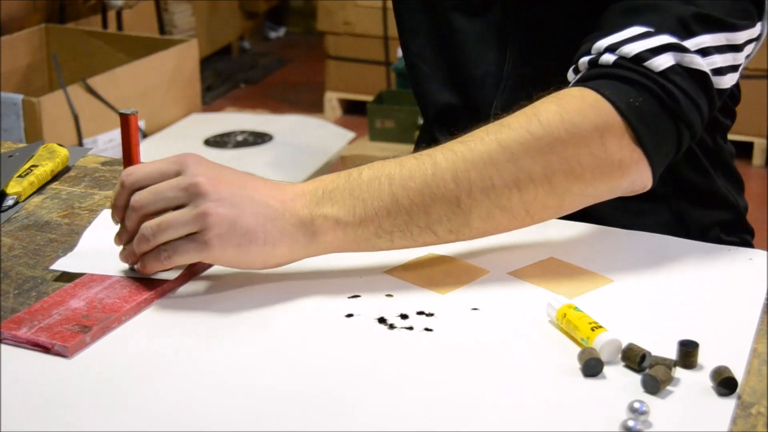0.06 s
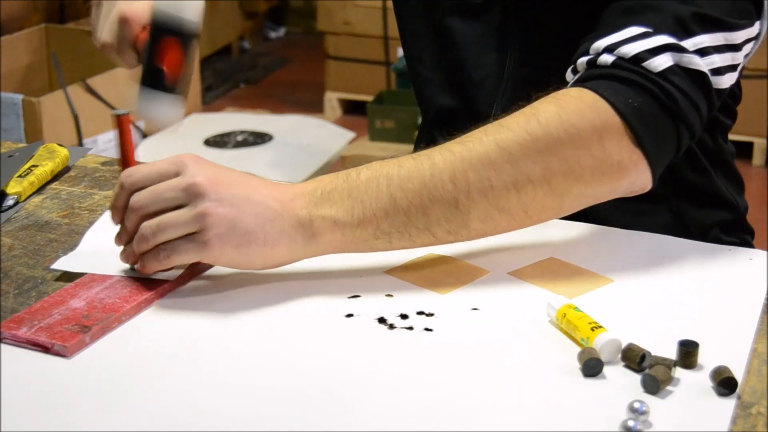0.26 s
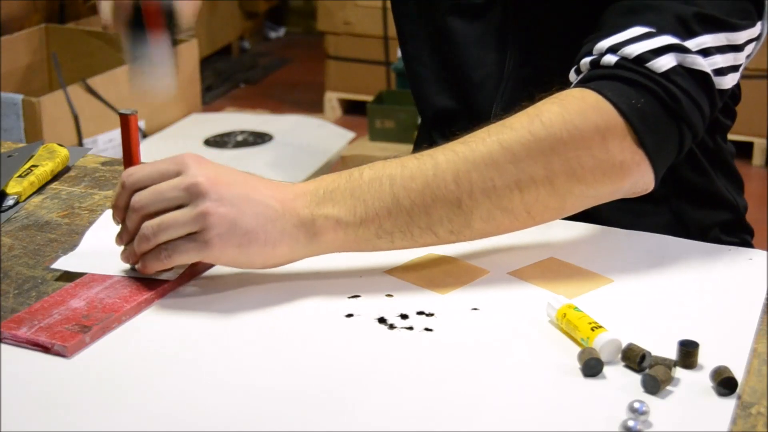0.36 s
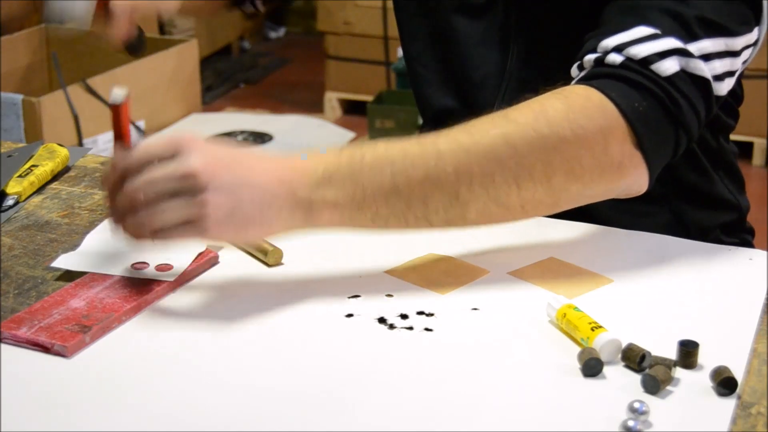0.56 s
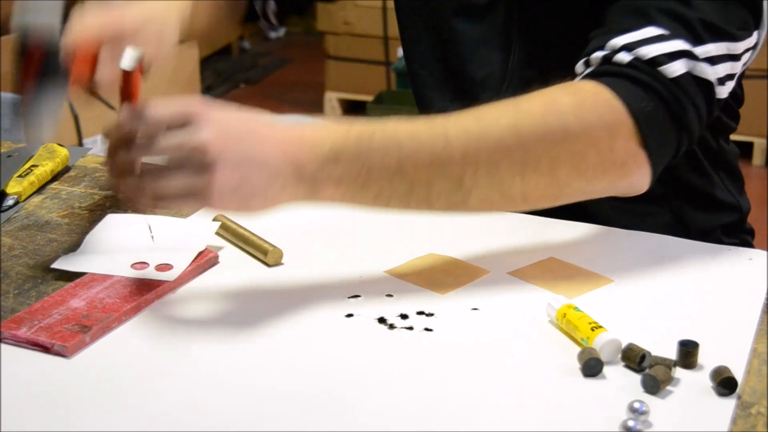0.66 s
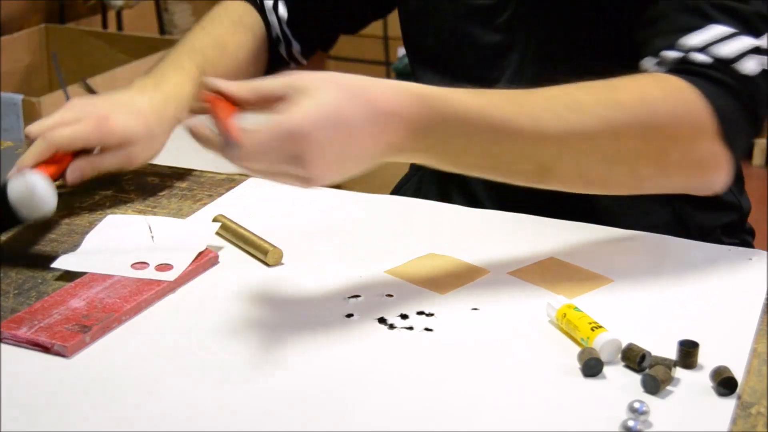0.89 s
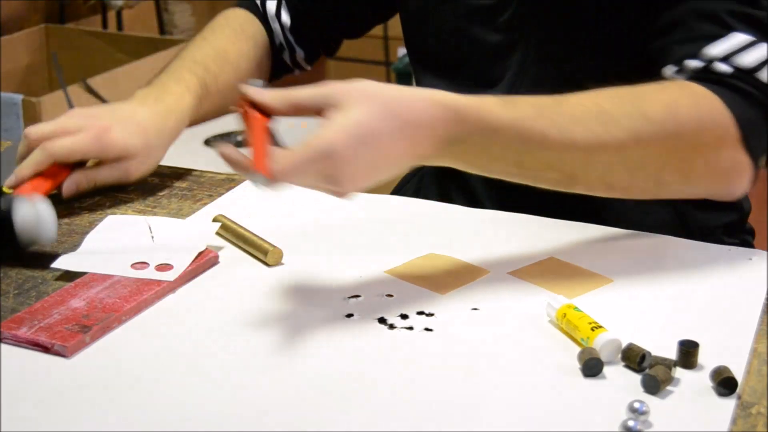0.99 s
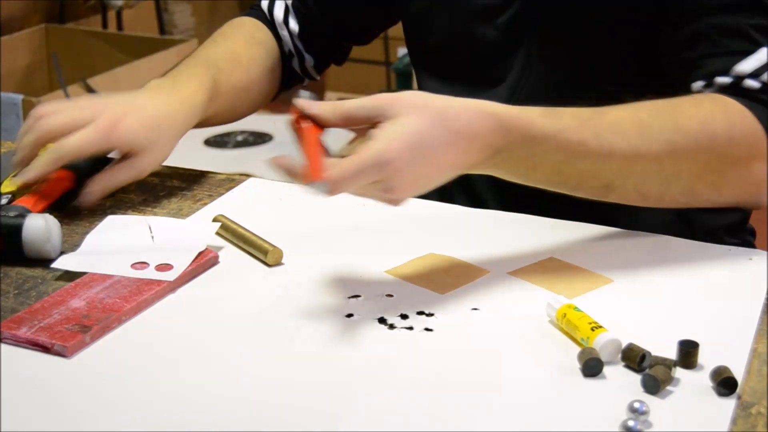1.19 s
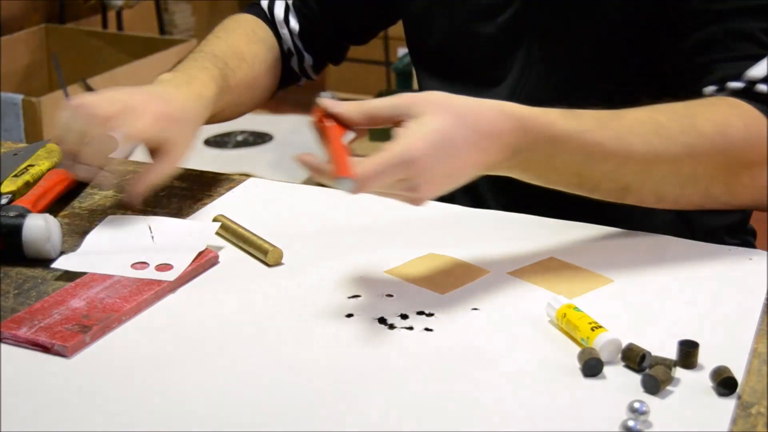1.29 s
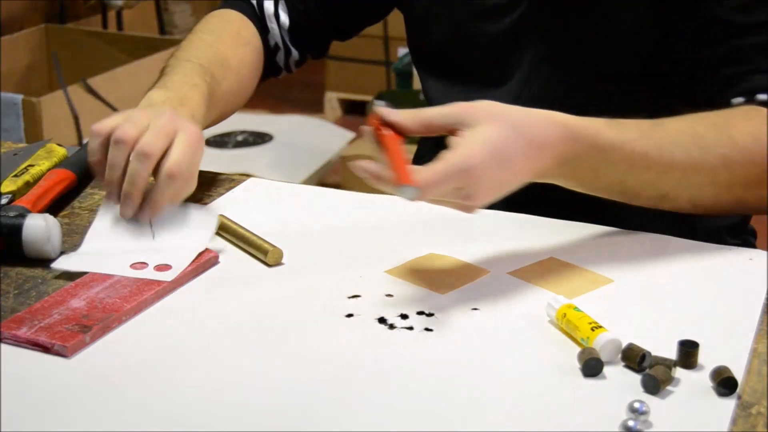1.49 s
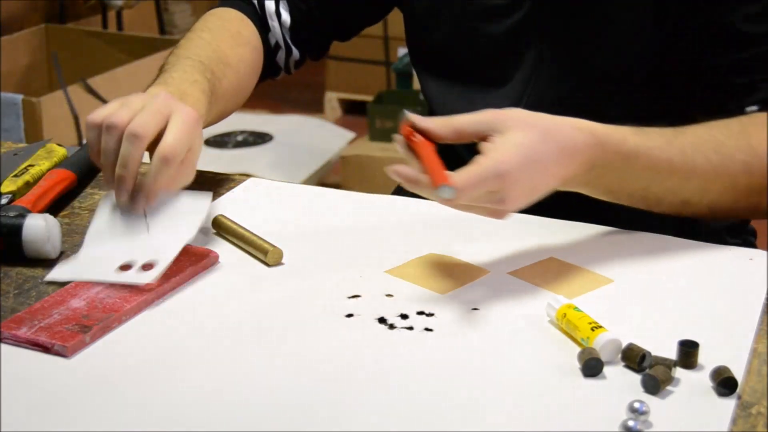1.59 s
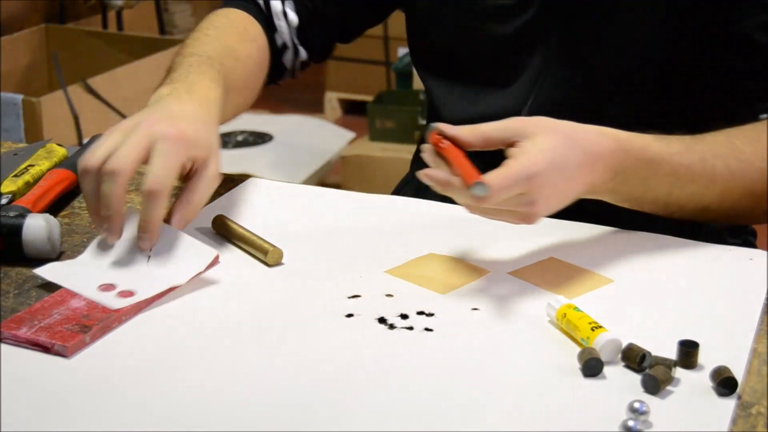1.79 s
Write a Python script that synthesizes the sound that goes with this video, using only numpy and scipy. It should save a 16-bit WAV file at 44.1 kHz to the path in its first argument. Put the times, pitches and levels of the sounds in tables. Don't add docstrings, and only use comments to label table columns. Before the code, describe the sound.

Hammer blow on a steel punch, one overloaded crack ringing through a storeroom, then tool knocks

```python
import sys
import numpy as np
from scipy import signal
from scipy.fft import rfft, irfft, next_fast_len
from scipy.io import wavfile
from scipy.ndimage import uniform_filter1d, map_coordinates

SR = 44100
rng = np.random.default_rng(int(sys.argv[2]) if len(sys.argv) > 2 else 0)


def volts(x):
    e = np.asarray(x, float) / 20
    return 10 ** e


def inscribe(sig):
    pcm = np.round(np.clip(np.atleast_2d(sig).T, -1, 1) * 32767)
    wavfile.write(sys.argv[1], SR, pcm.astype(np.int16))


N = 81585
T = np.arange(N) / SR
SECOND = T[:SR]
BLOW_S = .242


def unit(x):
    return x / np.sqrt(np.mean(x ** 2) + 1e-20)


def along(points, hz):
    f, v = np.transpose(points)
    return np.interp(np.log(hz + 1), np.log(f + 1), v)


def filtered(x, response):
    m = next_fast_len(len(x) + 8192)
    spectrum = rfft(x, m) * response(np.fft.rfftfreq(m, 1 / SR))
    return irfft(spectrum, m)[:len(x)]


def tail(t60s, tone):
    hz, t, z = signal.stft(rng.standard_normal(SR), SR, nperseg=256)
    colour = unit(volts(along(tone, hz))[:, None])
    decay = volts(-60 * t / along(t60s, hz)[:, None])
    return signal.istft(z * colour * decay, SR, nperseg=256)[1][:SR]


def ring(modes, attack_s, tilt_db=0, scatter_db=0):
    total = 0
    for hz, db, t60, *swing in modes:
        level = db + tilt_db * np.log2(hz / 1000) + scatter_db * rng.normal()
        decay = volts(level - 60 * SECOND / t60)
        total = total + np.prod(swing) * decay * np.sin(2 * np.pi * hz * SECOND)
    return (1 - np.exp(-SECOND / attack_s)) ** 2 * total


def waver(depth_db, rate_hz):
    return volts(depth_db * map_coordinates(rng.standard_normal(rate_hz + 4), [SECOND * rate_hz]))


def blur():
    return waver(2, 70)


def add(out, x, s):
    part = out[round(s * SR):][:len(x)]
    part += x[:len(part)]


# (frequency [Hz], level [dB])
AIR_TONE = [(30, -27), (100, -1.5), (300, -7), (1000, -6), (2500, -13), (5000, -22), (8000, -29.5),
            (11500, -39)]


def air():
    air_db, hum_db = -61.5, -72
    hum_hz, half_width_hz, patchy_db = 295, 8, 1.3
    z = signal.stft(rng.standard_normal(N), nperseg=512)[2]
    patches = uniform_filter1d(rng.standard_normal(z.shape), 5, 0)
    patches = uniform_filter1d(patches, 10, 1)
    noise = signal.istft(z * volts(patchy_db * unit(patches)), nperseg=512)[1][:N]
    noise = filtered(noise, lambda hz: volts(along(AIR_TONE, hz)))
    hum = filtered(rng.standard_normal(N), lambda hz: 1 / (1 + ((hz - hum_hz) / half_width_hz) ** 2))
    return volts(air_db) * unit(noise) + volts(hum_db) * unit(hum)


# (time [s], rise [ms], fall t60 [ms], level [dB], brightness [dB/octave])
RUB_EVENTS = [(0.828, 5.6, 77, -33, -0.7), (0.839, 6.1, 230, -43, -2.5), (.86, 33, 67, -48.5, 1.5),
              (.92, 33, 440, -52, -5), (.838, 0.59, 12, -32.5, -2), (.897, 2.2, 400, -52, -2.5),
              (0.9555, 0.55, 22, -46.5, -4.5), (.992, 14, 230, -51, -2.5), (1.038, 2.9, 87, -41, -3),
              (1.093, 18, 160, -46, 1), (1.115, 1.8, 193, -32, -2.5), (1.149, 10, 280, -27, -10),
              (1.234, 1.9, 61, -52, -3.5), (1.465, 11, 340, -63, 1), (1.484, 1.8, 52, -56.5, -2.5),
              (1.508, 0.96, 20, -59, -4), (1.522, 0.53, 20, -60, 17), (1.545, 2.2, 180, -60, 14),
              (1.572, 3.5, 130, -61, 8), (1.594, 0.93, 58, -51.5, 11.5), (1.612, .5, 15, -51, 14),
              (1.634, .5, 18, -54.5, 14), (1.637, .5, 19, -53, 12), (1.641, .5, 18, -53, 11),
              (1.607, 5.2, 240, -55, 14), (1.645, 34, 560, -66, 1), (1.6738, 0.31, 14, -51, 6),
              (1.7174, 0.39, 23, -50.5, -0.5), (1.724, 0.19, 11, -44.5, 3.5), (1.729, 5.3, 470, -59.5, 4.5),
              (1.762, 6, 57, -57, 7), (1.7798, .4, 16, -47.5, 10), (1.781, 2, 110, -60, 0.5),
              (1.812, 1, 43, -59, 0.5)]
# (frequency [Hz], level [dB])
PAPER_TONE = [(200, -20.5), (500, -2.5), (1800, 0.5), (3000, -4), (5700, -1), (7800, -9), (9500, -1.5),
              (11500, -19)]


def rubs():
    out, t = np.zeros(N), T[:SR // 2]
    grain_db, grain_samples = 2.5, 30
    for s, rise_ms, fall_ms, db, tilt_db in RUB_EVENTS:
        steps = np.repeat(rng.standard_normal(len(t) // grain_samples), grain_samples)
        grains = rng.standard_normal(len(t)) * volts(grain_db * steps)
        noise = filtered(grains, lambda hz: volts(along(PAPER_TONE, hz) + tilt_db * np.log2(hz / 3000 + 0.039)))
        ms = t * 1000
        shape = np.minimum(ms / rise_ms, 1) * volts(-60 * np.maximum(ms - rise_ms, 0) / fall_ms)
        add(out, volts(db) * shape * unit(noise), s)
    return out


# (time [s], frequency [Hz], level [dB], t60 [s])
CHINK_EVENTS = [(.831, 530, -38, .09), (.833, 1188, -36.5, .077), (.831, 1773, -38, .043),
                (.833, 5700, -41.5, .09), (.857, 6020, -47, .13), (.857, 6700, -47, .13),
                (.86, 4500, -50, .12), (.86, 3900, -52, .12), (.855, 5400, -48, .15),
                (.855, 8650, -50, .13), (.85, 10400, -58, .13), (.86, 9130, -56, .1),
                (1.0422, 6400, -36, .03), (1.04, 9780, -47, .07), (1.045, 7400, -52, .12),
                (1.079, 5700, -46, .09), (1.118, 5750, -33.5, .064), (1.118, 9300, -44, .044),
                (1.128, 4400, -37, .06)]


def chinks():
    out = np.zeros(N)
    for s, hz, db, t60 in CHINK_EVENTS:
        pair = [(hz, db, t60), (hz * 1.015, db - 5, t60)]
        add(out, blur() * ring(pair, t60 / 40), s)
    return out


# (frequency [Hz], level [dB])
WASH_TONE = [(80, -34.5), (220, -10), (550, -4.5), (1200, -0.5), (2000, -11.5), (3200, -25), (5000, -46),
             (10000, -52)]
# (frequency [Hz], t60 [s])
WASH_T60 = [(150, 0.8), (1000, 0.39), (4000, 0.17), (10000, 0.082)]


def wash(tilt_db=0):
    tone = [(hz, db + tilt_db * np.log2(hz / 1000)) for hz, db in WASH_TONE]
    return tail(WASH_T60, tone) * (1 - np.exp(-SECOND / 0.004))


# (time [s], level [dB], brightness [dB/octave])
HANDLE_KNOCKS = [
    (.9572, -43, -8),
    (1.14515, -3.3, 0),
    (1.1642, -18, -3),
    (1.1938, -16, -5),
    (1.2272, -25, -5),
    (1.249, -30, -5),
    (1.27, -36, -3),
]
# (frequency [Hz], level [dB], t60 [s], first swing [sign])
HANDLE_MODES = [(200, -14, .015, -1), (221, -27, .1, -1), (291, -9.5, .013, 1), (335, -26, .09, 1),
                (446, -12.5, .045, 1), (552, -5.5, .04, -1), (640, -23, .1, 1), (725, -7, .035, -1),
                (802, -11, .032, 1), (1026, -21, .1, 1), (1112, 0, .019, 1), (1290, -18, .025, 1),
                (1643, -28, .047, 1)]


def handle_bounces():
    out = np.zeros(N)
    for s, db, tilt_db in HANDLE_KNOCKS:
        knock = volts(-26) * wash(tilt_db) + ring(HANDLE_MODES, .0005, tilt_db, scatter_db=.7)
        add(out, volts(db) * knock, s)
    return out


# (frequency [Hz], level [dB], t60 [s], first swing [sign])
HEAD_MODES = [(341, -5.3, .004, -1), (468, -19, .069, -1), (562, -6.2, .039, 1), (654, -4.9, .021, 1),
              (733, -21, .12, -1), (832, -22, .12, 1), (1066, -5.9, .055, 1), (1214, -1.6, .042, 1),
              (1251, 11.7, .007, -1), (1463, -2.6, .019, 1), (1717, -1.1, .016, 1), (1884, -14, .036, 1),
              (2167, -10, .011, 1), (4300, -14, .003, 1)]
# (frequency [Hz], level [dB], t60 [s], first swing [sign])
REBOUND_MODES = [(316, -31, .052, 1), (477, -16, .031, 1), (551, -14, .047, -1), (622, -26, .083, -1),
                 (722, -21.5, .092, 1), (778, -24, .12, 1), (1067, -18.5, .085, 1), (1123, -11.5, .032, -1),
                 (1393, -14, .044, 1), (1689, -25, .035, -1)]


def head_landing():
    out = np.zeros(N)
    add(out, volts(-20.5) * wash() + ring(HEAD_MODES, .00015), 1.03413)
    add(out, volts(-28) * wash() + ring(REBOUND_MODES, .0004), 1.0829)
    return out


def through_table(x):
    return filtered(x, lambda hz: hz ** 4 / (hz ** 4 + 120 ** 4))


# (frequency [Hz], level [dB])
CRACK_TONE = [(60, -52), (170, -29.5), (400, -8.5), (700, -13), (1150, -3.5), (2700, -14), (4800, -27),
              (11000, -44.5)]
# (frequency [Hz], t60 [s])
ROOM_T60 = [(80, 0.66), (250, 0.69), (1000, 0.69), (3000, 0.8), (6000, 0.53), (11000, 0.49)]
# (frequency [Hz], level [dB])
JANGLE_TONE = [(7600, -39), (8400, 0), (9300, -1.5), (10300, -3), (11000, -42)]
# (frequency [Hz], t60 [s])
TOOLS_T60 = [(8000, .22), (10500, 0.79)]
# (frequency [Hz], level [dB], t60 [s])
STEEL_MODES = [(5270, -9, .42), (6293, -8, .5), (6400, -2, .12), (7250, -7.5, .56), (8640, 0, .14),
               (8694, -12, .3), (9126, 3, .17), (9641, -10, .3), (10217, 2, .33), (11195, -12, .26)]
# (frequency [Hz], level [dB], t60 [s])
SHELF_MODES = [(178, -22, 2.2), (339, 6, .4), (412, 4, .5), (470, -14, 1.0), (1130, 10, .35), (1187, 9, .4)]
# (frequency [Hz], level [dB], t60 [s])
BLOCK_MODES = [(1120, -5, .1), (1195, -4, .1)]


def blow():
    out = np.zeros(N)
    room = volts(-9) * tail(ROOM_T60, CRACK_TONE)
    jangle = volts(-37.5) * tail(TOOLS_T60, JANGLE_TONE)
    lines = sum(blur() * ring([mode], .009) for mode in STEEL_MODES)
    steel = volts(-29) * waver(1.5, 40) * lines
    shelf = volts(-27.5) * waver(1.5, 40) * ring(SHELF_MODES, .002)
    block = ring(BLOCK_MODES, .002)
    add(out, room + jangle + steel + shelf + block, BLOW_S)
    return out


def scene():
    table = through_table(chinks() + handle_bounces() + head_landing())
    return (air() + rubs() + table + blow())[None]


def band_limit(x):
    return signal.sosfilt(signal.butter(12, 21000, fs=SR, output="sos"), x)


# (time [s], hold [ms], return [ms], height [full scale])
POP_EVENTS = [
    (.24197, .14, .06, 2),
    (.24211, .21, .06, -2.2),
    (.24233, .19, .06, 2.4),
    (.24252, .8, 1.0, -3),
    (.24408, .12, .06, 1.2),
    (.24732, .19, .08, 2.5),
    (.25466, .18, .08, 2.0),
    (.25671, .2, .08, .45),
    (.25898, .27, .08, 1.6),
    (.25963, .2, .08, 2.4),
]
# (time [s], level [dB])
GAIN_CURVE = [
    (0.261, 12.5),
    (0.269, 3.5),
    (0.274, 1),
    (.43, 2.5),
    (.53, 0.5),
    (0.798, 0.26),
]


def record(dry):
    free_s, coupling_s, edge_ms = .2589, .00032, .06
    low_hz, top_hz = 100, 11150

    def step(s, ms):
        return np.clip((T - s) * 1000 / ms + .5, 0, 1)

    swings = np.zeros(N)
    for s, hold_ms, back_ms, height in POP_EVENTS:
        swings += height * (step(s, edge_ms) - step(s + hold_ms / 1000, back_ms))
    pops = filtered(swings, lambda hz: 1 - 1 / (1 + 2j * np.pi * hz * coupling_s))
    free = 1 - step(BLOW_S, edge_ms) + np.clip((T - free_s) / .001, 0, 1)
    s, db = np.transpose(GAIN_CURVE)
    gain = volts(np.interp(T, s, db, left=0))
    heard = filtered(dry[0], lambda hz: (1 - 1 / (1 + 1j * hz / low_hz)) ** 2 / (1 + (hz / top_hz) ** 60))
    x = heard * free * gain + pops
    x = filtered(np.clip(x, -1, 1), lambda hz: 1 / (1 + (hz / 12000) ** 6))
    x = filtered(np.clip(x, -.96, .96), lambda hz: 1.03 / (1 + (hz / 16800) ** 30))
    mix = np.clip(x, -1, 1)[None]
    return band_limit(mix)


dry = scene()
out = record(dry)
inscribe(out)
```